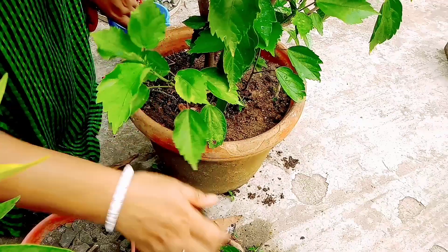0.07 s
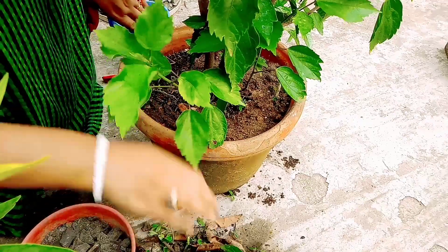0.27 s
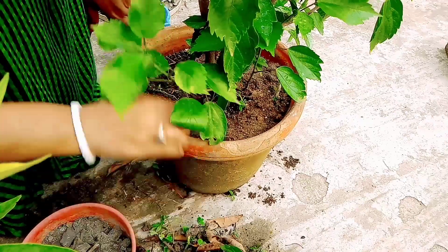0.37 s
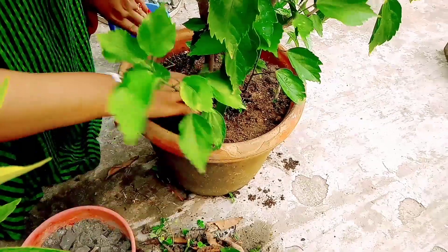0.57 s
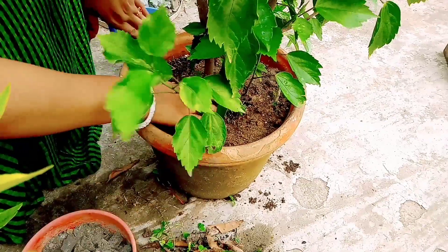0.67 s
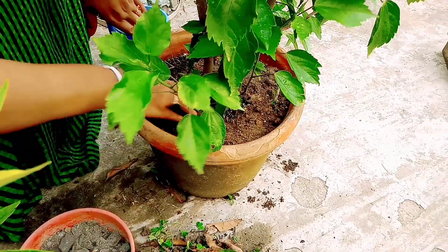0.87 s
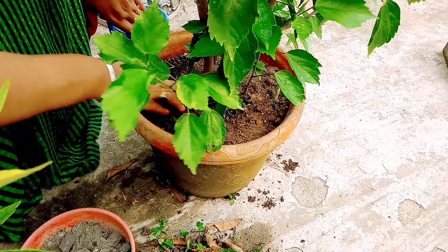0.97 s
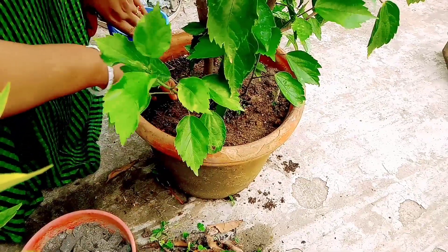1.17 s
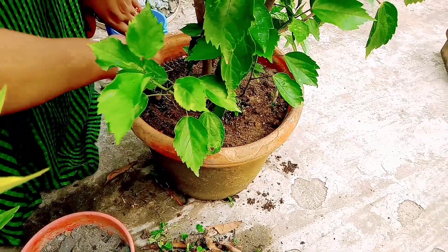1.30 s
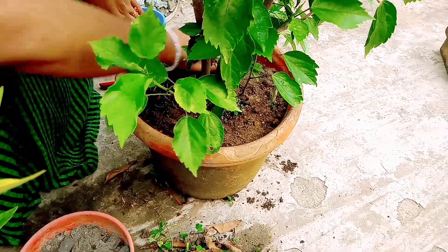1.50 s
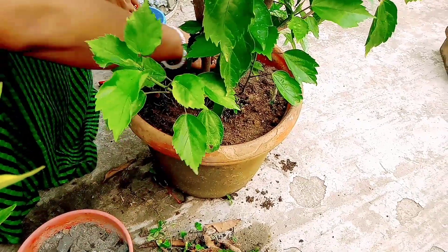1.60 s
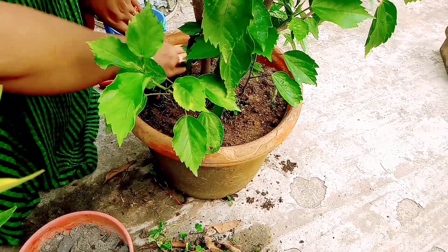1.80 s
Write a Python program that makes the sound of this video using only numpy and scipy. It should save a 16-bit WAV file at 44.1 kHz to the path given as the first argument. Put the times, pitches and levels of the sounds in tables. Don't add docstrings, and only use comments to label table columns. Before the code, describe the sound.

A close brittle leaf crackle scatters into small snaps, followed by hard little pot knocks, soft plucking and a final soil scrape, over distant birds, faint town hum and thin hiss in an open yard.

```python
import sys
import numpy as np
from scipy import signal
from scipy.fft import rfft, irfft, next_fast_len
from scipy.io import wavfile
from scipy.ndimage import uniform_filter1d, map_coordinates

SR = 44100
rng = np.random.default_rng(int(sys.argv[2]) if len(sys.argv) > 2 else 0)


def linear_from_db(decibels):
    return 10 ** (np.asarray(decibels, float) / 20)


def put_to_file(sound):
    columns = np.atleast_2d(sound).T
    safe = np.clip(columns, -1, 1)
    whole_steps = np.round(safe * 32767)
    wavfile.write(sys.argv[1], SR, whole_steps.astype(np.int16))


N = 81585

# freq_hz, gain_db
LEAF_SPECTRUM = [(1470, -60), (2700, -17), (4080, -7.5), (4760, -0.5), (7360, -3), (10200, 11.5),
                 (12800, -5.5), (13900, -2.5), (16000, -5.5)]
NEAR_T60_S = 0.044


def unit(x):
    return x / np.sqrt(np.mean(x ** 2) + 1e-20)


def colour(points):
    hz, db = np.transpose(points)
    knots_hz = np.r_[hz[0] / 2, hz, hz[-1] * 2]
    knots_db = np.r_[db[0] - 40, db, db[-1] - 40]
    return lambda f: linear_from_db(np.interp(np.log(f + 1), np.log(knots_hz), knots_db))


def filtered(x, response):
    size = next_fast_len(x.shape[-1] + 4096)
    spectrum = rfft(x, size) * response(np.fft.rfftfreq(size, 1 / SR))
    return irfft(spectrum, size)[..., :x.shape[-1]]


def peak(centre_hz, q):
    def response(f):
        damping = 1j * f * centre_hz / q
        return damping / (centre_hz * centre_hz - f * f + damping)
    return response


def wobble(rate_hz):
    return map_coordinates(rng.standard_normal(1000), [np.arange(N) * rate_hz / SR])


def add(track, start_s, x):
    part = track[round(start_s * SR):][:len(x)]
    part += x[:len(part)]


def echo(x, t60_s):
    t = np.arange(SR // 2) / SR
    tail = rng.standard_normal(SR // 2) * linear_from_db(-60 * t / t60_s)
    return signal.fftconvolve(x, tail / np.linalg.norm(tail))[:N]


def crackle(points):
    breaks_per_s, spread_db, friction_db = 1100, 2.5, -5.5
    hits = (rng.random(N) < breaks_per_s / SR) * linear_from_db(spread_db * rng.exponential(size=N))
    decay = linear_from_db(-60 * np.arange(200) / SR / 0.0053)
    puffs = np.convolve(hits, decay)[:N] * rng.standard_normal(N)
    friction = linear_from_db(friction_db + 5.1 * wobble(70.63)) * rng.standard_normal(N)
    return unit(filtered(unit(puffs) + friction, colour(points)))


def rustle():
    # time_s, level_db, dull_twigs_db
    crush = [
        (0.229, -72, -35),
        (0.247, -37.5, -10.5),
        (0.278, -28.5, -5.5),
        (0.306, -39, -8),
        (0.421, -43, -4.5),
        (.5, -52, -7),
        (.57, -60, -20.5),
        (.66, -56, -19),
    ]
    # peak_s, rise_s, fall_s, level_db, dull_part_db
    brushes = [
        (0.109, 0.011, 0.021, -61.5, -34),
        (0.764, 0.11, 0.1, -68.5, 19),
        (0.887, 0.023, 0.11, -51, -9.5),
        (1.012, 0.043, 0.062, -53, -7),
        (1.059, 0.017, 0.041, -50, 1.5),
        (1.156, 0.074, 0.063, -63, -7),
        (1.327, 0.039, 0.059, -53.5, -3.5),
    ]
    # freq_hz, gain_db
    stem_spectrum = [(290, -51), (500, -59), (645, -12.5), (744, -16.5), (1530, 3), (2100, 3), (2710, 6),
                     (7000, -14), (9100, -71), (15400, -120)]
    t = np.arange(N) / SR
    times, crush_db, twigs_db = np.transpose(crush)
    bright = linear_from_db(np.interp(t, times, crush_db, left=-120, right=-120))
    dull = bright * linear_from_db(np.interp(t, times, twigs_db))
    for top_s, rise_s, fall_s, db, dull_db in brushes:
        distance = np.where(t < top_s, (top_s - t) / rise_s, (t - top_s) / fall_s)
        env = linear_from_db(db - 20 * distance ** 1.38)
        bright = bright + env
        dull = dull + env * linear_from_db(dull_db)
    return bright * crackle(LEAF_SPECTRUM) + dull * crackle(stem_spectrum)


def snaps():
    # start_s, peak_db, leaf_pitch_hz, body_over_fizz_db
    leaf_breaks = [(0.2462, -6, 5700, -5), (0.2490, -16, 5170, -6), (0.2549, -8, 5100, -2),
                   (0.2580, -18, 5000, 3), (0.268, -16.5, 4940, -9), (0.2730, -18, 5150, -2),
                   (0.282, -9, 5200, -3), (0.2707, -6, 5100, -1), (0.2767, -5.5, 6250, -39),
                   (0.2786, -12.5, 5300, 1), (0.284, -3, 6050, -29), (0.2896, -14, 5460, -10),
                   (0.2996, -19, 4900, 1), (0.3095, -16, 7000, -12), (0.3182, -15, 5650, -7),
                   (0.3200, -22, 3850, 0), (0.3223, -17, 6540, 10), (0.3267, -19, 3860, 4),
                   (0.3339, -15.5, 6040, -7), (0.345, -15.5, 3690, 3.5), (0.3507, -23, 5200, 1),
                   (0.3553, -21, 4770, -2), (0.361, -24, 6200, -14), (0.3642, -22, 7000, 2),
                   (0.3808, -26.5, 4000, 0), (0.388, -19.5, 3780, 0.5), (0.393, -23, 6600, 1),
                   (0.3970, -27, 5940, 2), (0.403, -31, 5500, 3), (0.408, -24, 5840, -7),
                   (0.4151, -22, 5400, 10), (0.416, -20.5, 3700, 1), (0.426, -25.5, 3740, 2),
                   (0.4283, -25, 4000, -11), (0.447, -23, 3770, -5), (0.45, -28, 5030, 2),
                   (0.4625, -35, 4520, 4), (0.4672, -43, 2950, 0), (0.4727, -25.5, 3520, -27)]
    lone_ticks = [(0.2212, -31, 9700, 1), (0.2311, -33, 9600, 5), (0.2343, -9, 6050, -2.5),
                  (0.5016, -21, 3740, -0.5), (0.5289, -20.5, 6700, -5), (0.545, -37, 3970, 9),
                  (0.5883, -31, 3450, -4), (0.6, -29.5, 3850, -40.5), (0.623, -36, 3500, -20),
                  (0.6442, -49, 4460, -44), (0.8688, -38.5, 9700, 10), (0.884, -31, 5000, -11),
                  (0.8933, -32.5, 3180, 7), (0.9078, -34, 3260, -6), (0.984, -34.5, 9400, 11),
                  (0.9854, -34, 9600, 13), (0.9928, -34, 10100, 18), (0.999, -40, 5900, -2),
                  (1.0034, -18.5, 5500, -6), (1.0168, -35.5, 3380, -1), (1.031, -41, 2000, -12),
                  (1.04, -39, 10100, 15), (1.058, -30, 2820, -1), (1.0675, -36.5, 6640, -2),
                  (0.097, -52.5, 5900, -20), (1.3162, -38.5, 2100, 4), (1.3269, -38, 3840, -14)]
    snap_t60_s, rattle_t60_s, rise_s = 0.006, 0.043, 0.0002
    lead = 128
    out, t = np.zeros(N), np.arange(2000) / SR
    for events, rattle_db in ((leaf_breaks, -16), (lone_ticks, -23)):
        decay = linear_from_db(-60 * t / snap_t60_s) + linear_from_db(rattle_db - 60 * t / rattle_t60_s)
        env = np.pad(decay * (1 - np.exp(-t / rise_s)), (lead, 0))
        for start_s, db, pitch_hz, body_db in events:
            fizz_noise, body_noise = env * rng.standard_normal((2, len(env)))
            fizz = filtered(fizz_noise, colour(LEAF_SPECTRUM))
            body = filtered(body_noise, lambda f: peak(pitch_hz, 5)(f) * peak(pitch_hz, 1)(f) ** 2)
            snap = fizz / np.linalg.norm(fizz) + linear_from_db(body_db) * body / np.linalg.norm(body)
            add(out, start_s - lead / SR, linear_from_db(db - 3.5) * snap / abs(snap).max())
    return out


def knocks():
    # start_s, peak_db, crack_db
    contacts = [(0.6770, -21.5, 6), (0.6965, -18.5, 4), (0.6990, -36, 13), (0.7036, -25.5, -12),
                (0.7078, -22.5, 2.5), (0.7118, -29, -7), (0.7150, -30.5, 0.5), (0.7203, -36, 1),
                (0.733, -40, -10), (0.7755, -37.5, -18), (0.780, -30, -28), (0.785, -38, -28)]
    # freq_hz, level_db, t60_s
    clay_modes = [(1058, -11.5, 0.05), (1240, -8, 0.06), (1555, -1.5, 0.073), (1740, -16, 0.022),
                  (2184, 5.5, 0.046), (2480, 7.5, 0.028), (3020, -8, 0.02), (3330, 7.5, 0.033),
                  (3375, 2, 0.018), (4700, -3, 0.02), (5070, -12, 0.017)]
    # freq_hz, gain_db
    crack_spectrum = [(500, -32), (1200, -12.5), (3000, -3), (5300, -14), (6200, -26), (12000, -27.5)]
    crack_t60_s, longest_ring_s, rise_s = 0.019, 0.05, 0.00091
    ring_db, scatter_db = -12.5, 2
    out, t = np.zeros(N), np.arange(SR // 4) / SR
    for start_s, db, crack_db in contacts:
        ring = np.zeros(len(t))
        for mode_hz, mode_db, t60_s in clay_modes:
            decay = linear_from_db(mode_db + scatter_db * rng.normal() - 60 * t / min(t60_s, longest_ring_s))
            ring += decay * np.sin(2 * np.pi * (mode_hz * t + rng.random()))
        noise = linear_from_db(-60 * t / crack_t60_s) * rng.standard_normal(len(t))
        crack = filtered(noise, colour(crack_spectrum))
        strike = linear_from_db(ring_db) * ring + linear_from_db(crack_db) * crack / abs(crack).max()
        add(out, start_s, linear_from_db(db) * strike * (1 - np.exp(-t / rise_s)))
    return out


def wall_rubs():
    # start_s, length_s, hollow_hz, level_db
    rubs = [
        (.7, .13, 640, -64),
        (.9, .12, 610, -71),
        (1.03, .05, 620, -59),
        (1.013, .01, 1500, -56),
        (1.029, .03, 1500, -53),
        (.733, .018, 2130, -47),
        (.775, .015, 2150, -45),
        (.775, .014, 4800, -57),
    ]
    out, t = np.zeros(N), np.arange(SR // 4) / SR
    for start_s, length_s, hollow_hz, db in rubs:
        hum = unit(filtered(rng.standard_normal(len(t)), lambda f: peak(hollow_hz, 4)(f) ** 2))
        env = np.sin(np.pi * np.clip(t / length_s, 0, 1)) ** 0.5
        add(out, start_s, linear_from_db(db) * hum * env)
    return out


def drag():
    # time_s, level_db, hollow_hz
    stroke = [
        (1.661, -83, 1613),
        (1.696, -55.5, 1650),
        (1.74, -49, 1770),
        (1.789, -48.5, 2030),
        (1.85, -48, 2167),
    ]
    # freq_hz, gain_db
    soil_spectrum = [(290, -62), (500, -35), (734, -9), (1080, -6.5), (2050, -2.5), (3610, -3.5),
                     (7580, -23.5), (9650, -9.5), (15000, -28)]
    hollow_q, hollow_db, second_db, crumbs_db = 14, -7, -8, -4.5
    t = np.arange(N) / SR
    times, stroke_db, hollow_hz = np.transpose(stroke)
    phase = 2 * np.pi * np.cumsum(np.interp(t, times, hollow_hz)) / SR

    def hollow(ratio):
        in_phase = wobble(2000 / hollow_q) * np.sin(ratio * phase)
        quadrature = wobble(2000 / hollow_q) * np.cos(ratio * phase)
        return unit(in_phase + quadrature)

    friction = linear_from_db(1.5 * wobble(150)) * rng.standard_normal(N)
    soil = unit(filtered(friction, colour(soil_spectrum))) + linear_from_db(crumbs_db) * crackle(soil_spectrum)
    hollows = linear_from_db(hollow_db) * hollow(0.93) + linear_from_db(second_db) * hollow(1.68)
    return linear_from_db(np.interp(t, times, stroke_db, left=-120)) * (soil + hollows)


def falling_whistles():
    # start_s, length_s, top_hz, level_db
    calls = [
        (1.22, .084, 3950, -55),
        (1.457, .23, 4050, -53),
        (1.7, .07, 3450, -58),
    ]
    hang_s, fall_s, swell_s = 0.058, 0.047, 0.07
    bottom_hz, warble_hz, fade_db_s = 1600, 20, -135
    out = np.zeros(N)
    for start_s, length_s, top_hz, db in calls:
        t = np.arange(round(length_s * SR)) / SR
        slide = np.exp(-(np.hypot(t, hang_s) - hang_s) / fall_s)
        pitch = bottom_hz + (top_hz - bottom_hz) * slide + warble_hz * wobble(123.3)[:len(t)]
        swell = np.minimum(0.16 + (t / swell_s) ** 2, (length_s - t) / 0.01)
        env = np.clip(swell, 0, 1) * np.minimum(t * 100, 1)
        env = env * linear_from_db(fade_db_s * t + 2.5 * wobble(93)[:len(t)])
        add(out, start_s, linear_from_db(db + 11) * env * np.sin(2 * np.pi * np.cumsum(pitch) / SR))
    return out


def held_notes():
    # start_s, length_s, pitch_hz, level_db
    far_calls = [(1.07, .09, 2680, -66), (1.11, .14, 3320, -65), (1.2, .36, 3325, -59),
                 (1.33, .07, 3345, -56), (1.45, .3, 3305, -59), (0, .025, 3700, -73),
                 (1.14, .14, 2990, -70), (1.39, .06, 2985, -63), (1.44, .09, 2985, -64),
                 (1.15, .06, 3680, -67), (1.37, .2, 3650, -66), (1.24, .06, 2570, -71), (0, .03, 1870, -66)]
    flutter_db, wander_hz = 2.5, 14
    out = np.zeros(N)
    for start_s, length_s, pitch_hz, db in far_calls:
        t = np.arange(round(length_s * SR)) / SR
        pitch = pitch_hz + wander_hz * wobble(30.6)[:len(t)]
        env = np.sin(np.pi * t / length_s) ** 0.4 * linear_from_db(flutter_db * wobble(46.7)[:len(t)])
        add(out, start_s, linear_from_db(db) * env * np.sin(2 * np.pi * np.cumsum(pitch) / SR))
    return out


def bed(points, db, patch_db, rate_hz):
    cells = signal.stft(rng.standard_normal(N), nperseg=512)[2]
    patches = uniform_filter1d(rng.standard_normal(cells.shape), 5, 0)
    patches = uniform_filter1d(patches, 12, 1)
    noise = signal.istft(cells * linear_from_db(patch_db * unit(patches)), nperseg=512)[1][:N]
    return linear_from_db(db + wobble(rate_hz)) * unit(filtered(noise, colour(points)))


def town_hum():
    # freq_hz, gain_db
    hum_spectrum = [(18, -51), (30, -20), (50, -15.5), (81, 0.5), (114, 4), (411, -14), (509, -12.5),
                    (649, -15), (900, -21), (1170, -34), (1980, -120)]
    lorry_db, lorry_s = 3, 0.25
    lorry = linear_from_db(lorry_db * (np.arange(N) / SR < lorry_s))
    return bed(hum_spectrum, -68.5, 1.5, 5.52) * lorry


def open_air():
    # freq_hz, gain_db
    air_spectrum = [(800, 0), (2200, 4), (3300, 1), (4500, -4.5), (7500, -3.5), (12000, -19), (14500, -12),
                    (15000, -30)]
    return bed(air_spectrum, -74.5, 3, 11.4)


def thin_hiss():
    # freq_hz, gain_db
    hiss_spectrum = [(7800, -32), (8600, 17.5), (9250, 15.5), (9600, 10), (10000, 15.5), (11300, 16),
                     (11900, -13)]
    return bed(hiss_spectrum, -64, 2.5, 9.8)


def capsule_noise():
    # freq_hz, gain_db
    capsule_spectrum = [(60, -15), (3300, -1), (6500, -7.5), (11300, -7), (12500, -13)]
    return bed(capsule_spectrum, -74.5, 2.5, 4.7)


def scene():
    near = rustle() + snaps() + knocks() + wall_rubs() + drag()
    far = falling_whistles() + held_notes()
    mid = near + linear_from_db(-9.5) * echo(near, NEAR_T60_S)
    mid = mid + far + linear_from_db(-3) * echo(far, 0.4)
    mid = mid + open_air() + thin_hiss() + town_hum()
    side = capsule_noise() + linear_from_db(-36) * echo(mid, NEAR_T60_S)
    return np.array([mid + side, mid - side])


def roll_off(x):
    return signal.sosfilt(signal.butter(12, 16640, fs=SR, output="sos"), x)


def record(dry):
    top_hz, above_top_db = 15350, -37
    mix = filtered(dry, lambda f: np.where(f < top_hz, 1, linear_from_db(above_top_db)))
    return roll_off(mix)


dry = scene()
out = record(dry)
put_to_file(out)
```